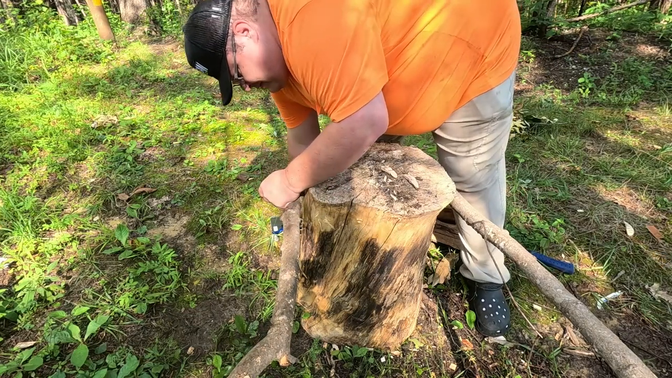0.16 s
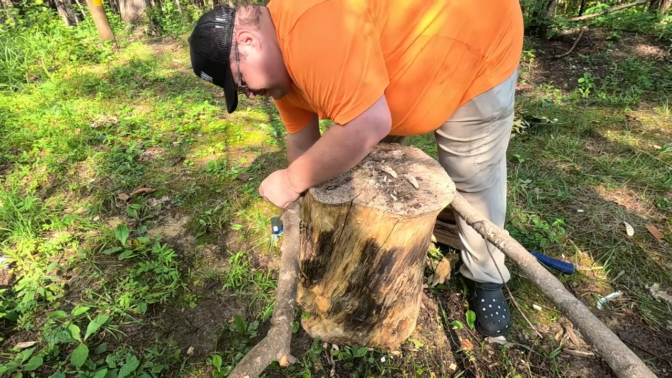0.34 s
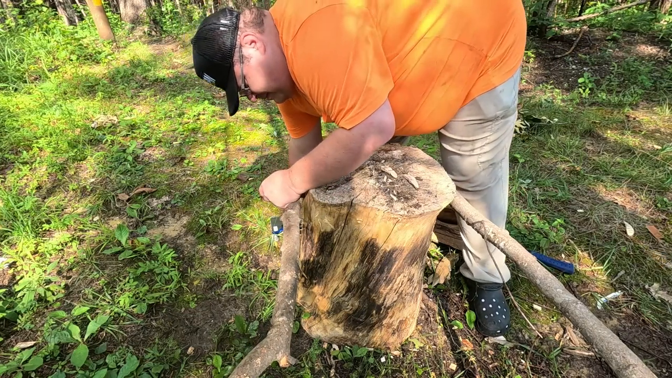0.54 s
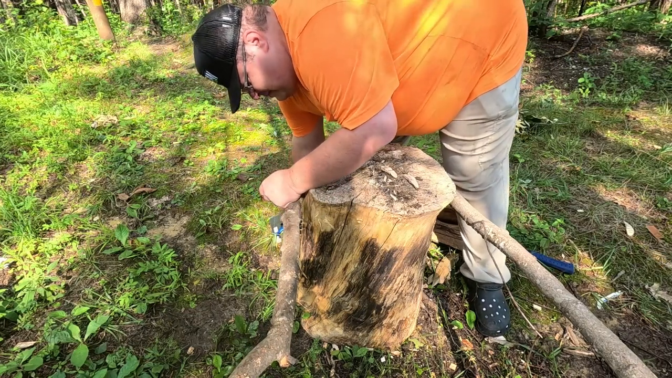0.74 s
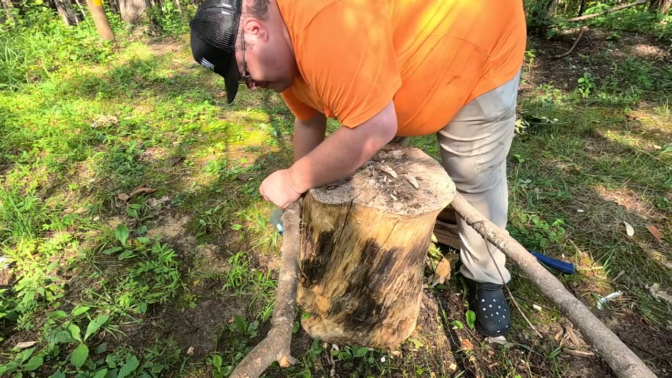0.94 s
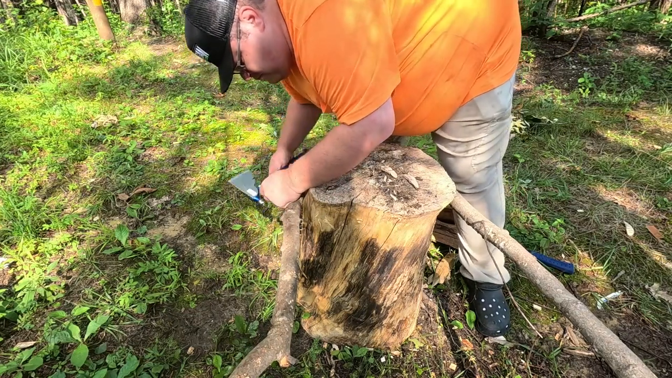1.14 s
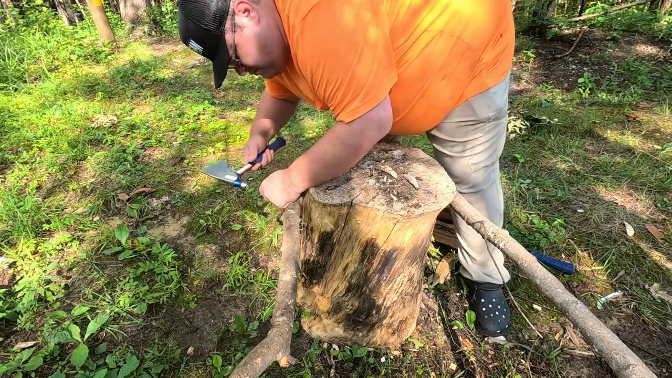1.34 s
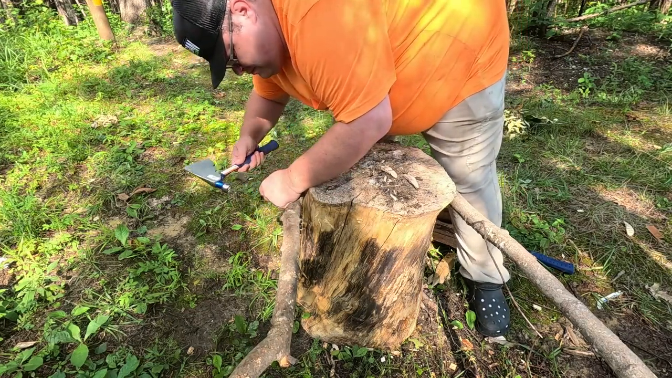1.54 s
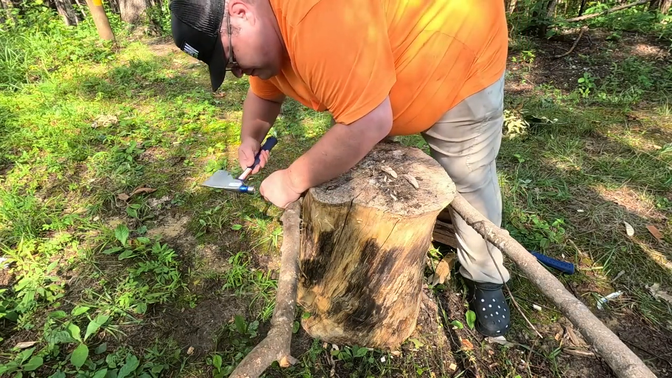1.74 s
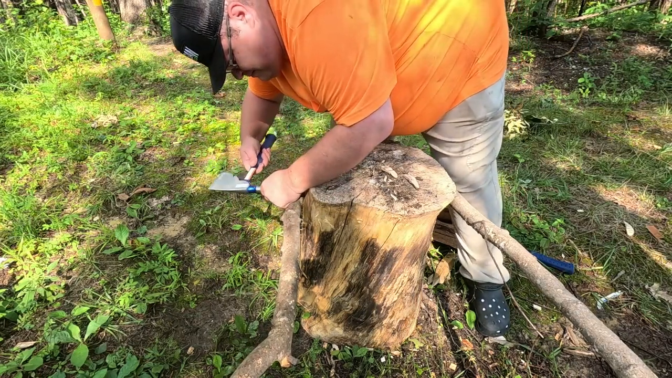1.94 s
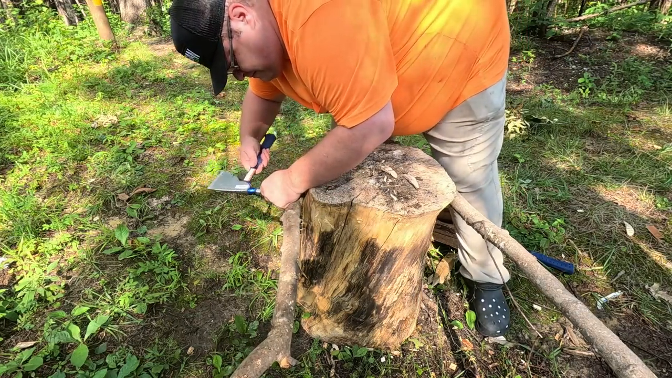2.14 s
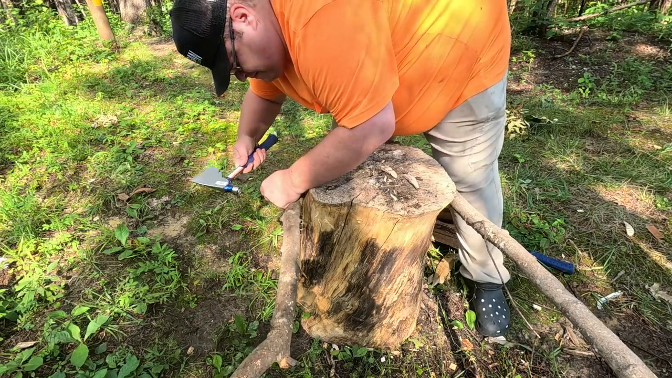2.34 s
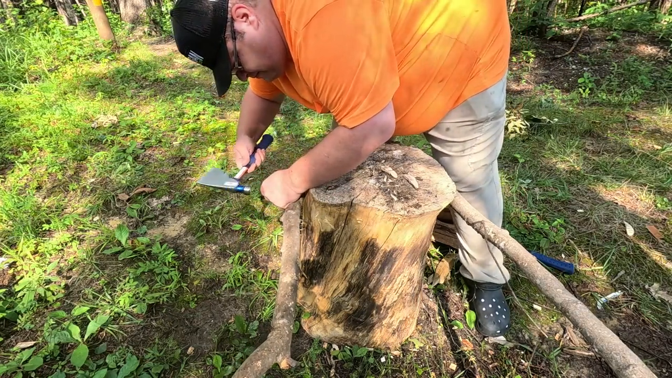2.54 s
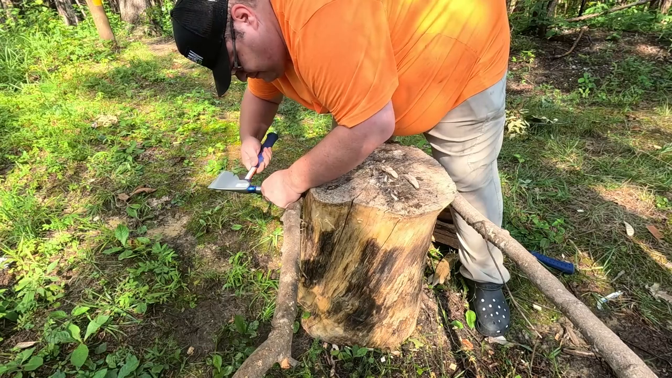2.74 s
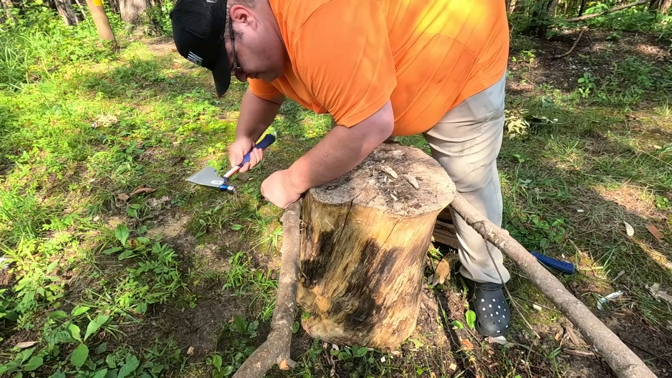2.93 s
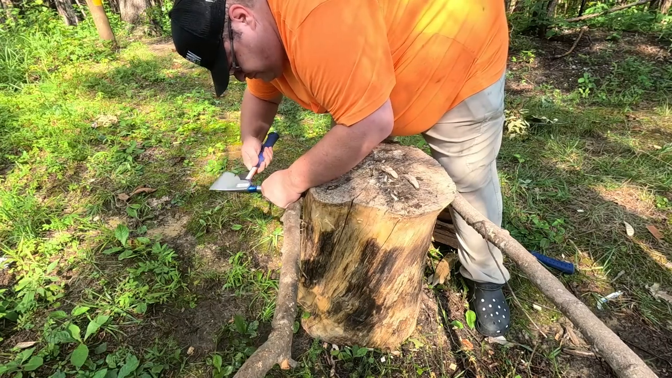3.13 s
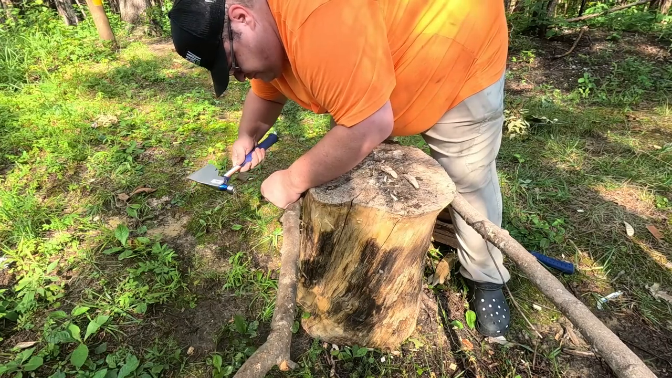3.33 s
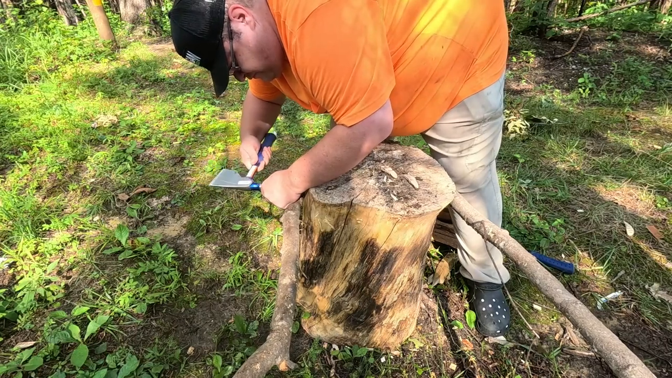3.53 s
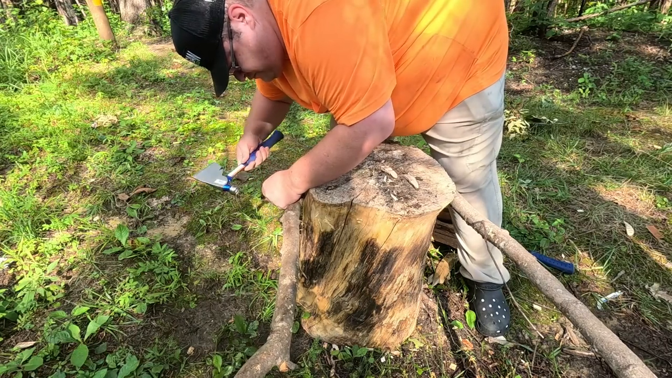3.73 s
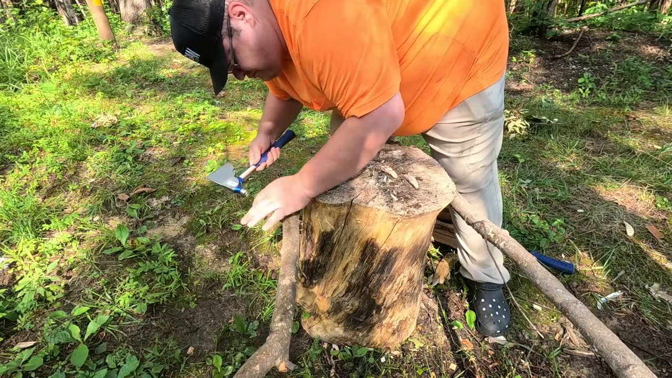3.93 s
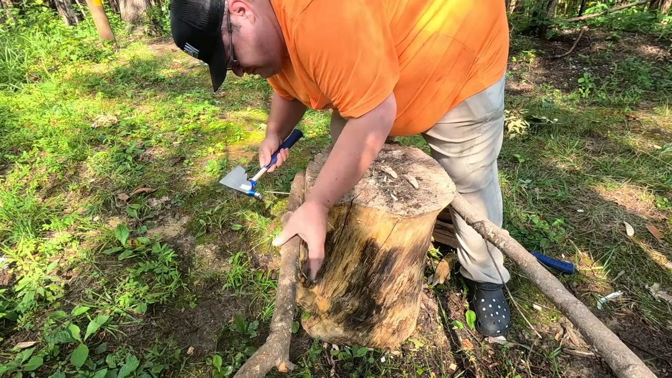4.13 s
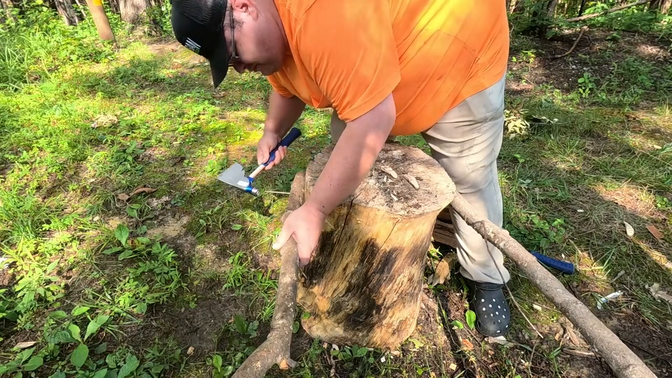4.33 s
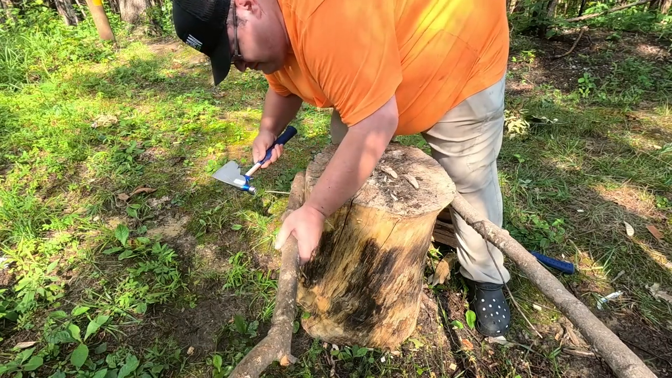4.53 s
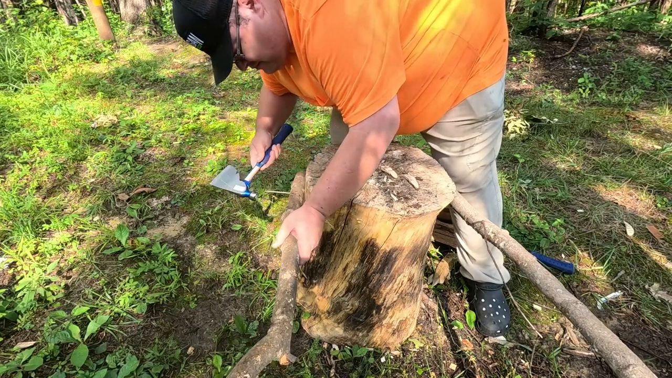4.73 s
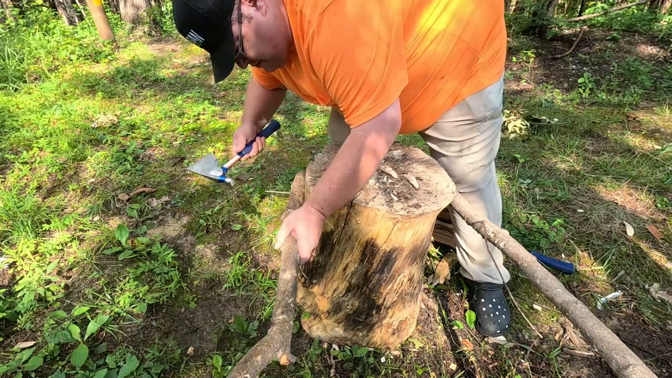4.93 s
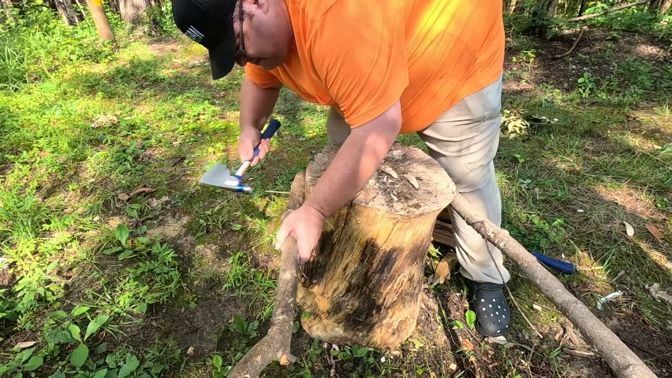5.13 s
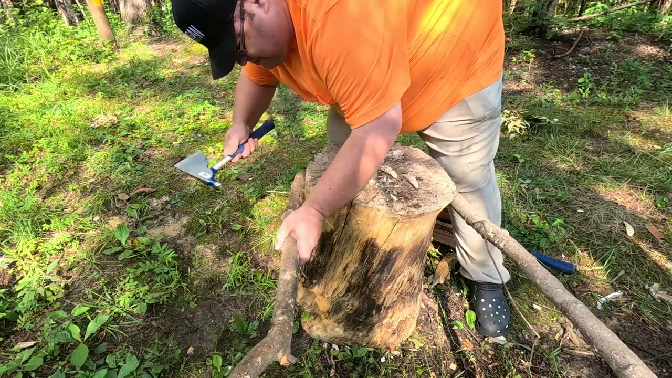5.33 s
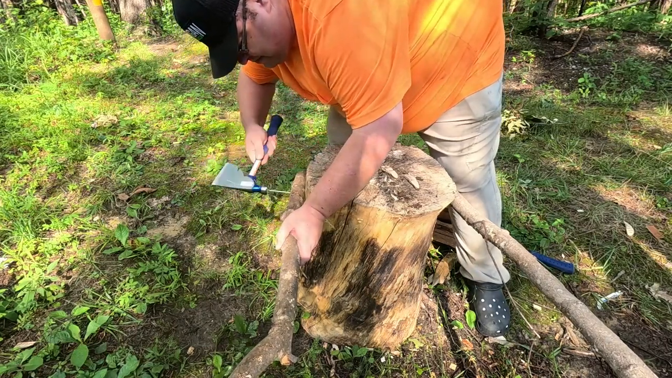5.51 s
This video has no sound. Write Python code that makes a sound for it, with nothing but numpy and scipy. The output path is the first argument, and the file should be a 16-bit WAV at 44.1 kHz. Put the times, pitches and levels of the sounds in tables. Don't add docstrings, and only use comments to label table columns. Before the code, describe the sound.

Close stereo microphone in a wood, soft leaf hiss all round and a faint far machine hum dying away. A twig scuffs dry leaves, then the back of a hatchet hits a nail in a branch seven times, each a short clacking crack with woody knock, thin steel ring and faint echo from the trees. After a pause with tiny ticks, a far bird whistles and a final blow lands.

```python
import sys
import numpy as np
from scipy import signal
from scipy.fft import rfft, irfft
from scipy.io import wavfile
from scipy.ndimage import uniform_filter1d, minimum_filter1d

SR = 44100
rng = np.random.default_rng(int(sys.argv[2]) if len(sys.argv) > 2 else 0)


def unload_wav(signal):
    wavfile.write(
        sys.argv[1],
        SR,
        np.round(np.clip(np.atleast_2d(signal).T, -1, 1) * 32767).astype(np.int16),
    )


def undo_db(level):
    steps = np.asarray(level, float) / 20
    return 10 ** steps


N = 245637

# [f/Hz, width/Hz, level/dB]
UPPER_HUMS = [(227.2, 3.1, -1), (269.7, 23, -5.5), (318.7, 13, -9.5), (433, 26, -14)]
# [t/s, level/dB]
MACHINE = [(0, -55), (.8, -52), (1.25, -56.5), (1.7, -63), (2.1, -62), (3.0, -72), (3.8, -76), (4.9, -64),
           (5.57, -77)]
DRONE_HZ = 162.7
UPPER_HUM_DB, UPPER_SHARE, UPPER_LAG_S = -58, 0.61, .35
# [t/s, level/dB]
GUSTS = [(2.02, -54), (2.36, -50.5), (2.67, -55), (2.93, -52), (3.4, -65.5), (4.4, -62), (4.85, -58.5),
         (5.4, -55.5)]
GUST_RISE_S, GUST_FALL_S, CALM_DB = .07, 0.12, -71.5

# [f/Hz, level/dB per Hz]
LEAVES = [(20, -8.5), (60, -7), (150, -0.5), (300, -8.5), (500, -15), (800, -18), (1050, -10.5),
          (1600, -11), (3200, -11), (6300, -17.5), (8000, -25.5), (10500, -33), (13000, -46.5),
          (16000, -68)]
# [t/s, level/dB]
LEAF_LEVEL = [(0, -52.5), (.25, -55.5), (.6, -53.5), (1.9, -53.5), (2.35, -55), (3.9, -57.5), (4.5, -55),
              (5.57, -55)]
# [f/Hz, likeness 0-1]
SAME = [(60, 1), (150, 0.97), (380, 0.45), (950, 0.68), (2380, 0.51), (5980, 0.8), (15000, 0.27)]
# [f/Hz, left minus right/dB]
LEAVES_LEAN = [(60, -1), (180, -2), (550, -1), (1650, 2.5), (4970, 2.0), (15000, 6)]

# [t/s, length/s, from f/Hz, to f/Hz, level/dB]
BIRD = [
    (4.94, .06, 2830, 3250, -61),
    (5.118, .06, 2950, 2550, -58),
    (5.19, .04, 2800, 2780, -65),
]
# [t/s, length/s, level/dB, from f/Hz, to f/Hz]
RUSTLE = (.45, .38, -61, 1100, 1800)

# [f/Hz, t60/s]
WOODLAND = [(300, 0.73), (1000, 0.26), (2500, 0.79), (6000, 0.49), (12000, 0.42)]
# [f/Hz, level/dB]
ECHO_COLOUR = [(200, -4), (700, 3.5), (1500, 4), (2050, -4.5), (2230, 9), (2450, -2), (3100, 4.5),
               (4000, 5), (6900, 7), (8000, -2.5), (10500, -0.5), (13500, -13)]
ECHO_DB, ECHO_LOOSE_DB = -25.5, -12.5

# [t/s, level/dB, brightness/dB]
TICKS = [
    (0.7938, -52, -16.5),
    (0.8676, -58, -2),
    (3.6474, -27, -10),
    (4.5054, -53, -6),
    (4.5166, -42, -13),
    (4.5413, -50, -18),
]
TICK_SHARES = [5, 0, -6, 5, -4, -8]
TICK_GLINTS = [-17, 4, 5, -5, -12, -7]
TICK_SIZZLE_DB = 16

# [t/s, force/dB, brightness/dB, nearness to the middle of the poll 0-1, tilt of the head 0-1]
BLOWS = [
    (1.8136, -20.5, -4.5, 0, 0.4),
    (2.038, -18.5, -0.5, .15, .05),
    (2.2918, -15, -5, .27, 0.64),
    (2.5478, -13.5, -7, 1, 0),
    (2.865, -13.5, -6, .28, 0.2),
    (3.2184, -13, -6.5, .12, 0.2),
    (3.5878, -13, -10, .15, 0.86),
    (5.2938, -10.5, -11.5, .72, 0.93),
]
SET_BLOWS, TIGHT_BLOWS, REST_S = .9, 3.5, 1.0
HAND_OFF_S = 4.0

# [f/Hz, width/Hz]
CRACK = [(1565, 260), (2190, 300), (2630, 380), (3090, 450), (3750, 560), (4250, 710)]
# [level/dB, loose nail/dB, hand off the nail/dB]
SHARE_LAW = [(2, -3, -4.5), (-5.5, -17, 12.5), (2, -3, -4.5), (7, -2.5, -2.5), (1, 3, 2), (-5.5, 9.5, -5)]
# [f/Hz, width/Hz]
SNAP = [(5300, 440), (6200, 550), (7100, 220), (7700, 360), (8700, 830), (9750, 650)]
# [level/dB, loose nail/dB, struck mid-poll/dB, hand off the nail/dB]
GLINT_LAW = [(-1, 20, -7, 9), (3, 10.5, -20, 4), (-0.5, 12, 6.5, -1), (0, 9, 14.5, -16), (-0.5, -12, 9, 2),
             (-4.5, 19, -10.5, 2)]
BROAD_DB, SIZZLE_DB, SIZZLE_TIGHT_DB = -6.5 + .5, -24.5, -6
SLIP_S, SLIP_LOOSE_S = 0.0051, .008
# [from f/Hz, to f/Hz, level/dB, t60/s]
SCATTER = [(660, 2970, -8.5, 0.025), (1670, 2300, -7.5, 0.048), (3300, 6600, -38, 0.13)]

# [f/Hz, level/dB, t60/s]
BRANCH = [(436, -25, .15), (478, -23, 0.17), (603, -16, 0.17), (622, 0, 0.055), (668, -4, 0.045),
          (727, -26, .16), (795, -15, 0.11), (905, -19, .06), (1042, -3, 0.072), (1110, -10, .06),
          (1185, -2, 0.055), (1290, -9, 0.05)]
UPPER_DB, UPPER_TIGHT_DB, UPPER_FREED_DB = 4, -7, -4
# [f/Hz, level/dB, t60/s]
STUMP = [(67.9, -26, 0.62), (118, -23.5, 0.27), (171, -21.5, 0.28), (222.4, 0, 0.22), (286.6, 8.5, 0.19)]
BOOM_LOOSE_DB = -12
KNOCK_DB, BOOM_DB = -9, -22.5
PAUSE_DB = (-5, -4, 2.5)

# [f/Hz, t60/s, loss to the grip/dB]
STEEL = [(4659, .8, 5), (6545, .08, 0), (9530, .4, 3), (11035, .36, 15), (12965, .36, 14), (14470, .35, 0)]
# [ring/dB, after a pause/dB, tight grip/dB, struck mid-poll/dB, tilted/dB]
STEEL_LAW = [(-49, 11, 0, 0, 0), (-34, 0, -16, -4, 0), (-70, 0, 0, 0, 21), (-55, 2, 0, -24, 0),
             (-61, 3, 0, -26, 0), (-110, 0, 0, 0, 42)]
REBOUND_S, SWELL_TIGHT = 0.097, 1.4

# [f/Hz, left minus right/dB]
BLOW_LEAN = [(60, 5), (300, -1), (700, -1.5), (1400, -2.5), (2800, -1), (5600, 0.5), (10000, 3.5),
             (14000, 4.5)]
# [f/Hz, lead of the left port/rad]
BLOW_LEAD = [(0, 0.62), (2410, -0.34), (10200, -0.55), (10800, 0.4), (11200, -0.098), (13000, 1.6),
             (14100, 0.1), (16100, -0.33)]
# [f/Hz, level/dB]
HAZE = [(100, -39), (350, -36), (600, -8), (1200, -25.5), (2500, -24), (5000, -48), (8000, -17),
        (10000, -46), (14000, -40)]


def evened(x):
    return x / np.sqrt(np.mean(x ** 2) + 1e-20)


def peaked(x):
    return x / np.sqrt(uniform_filter1d(x ** 2, 130).max())


def read(points, hz):
    f, value = np.transpose(points)
    return np.interp(np.log(hz + 1), np.log(f + 1), value)


def curve(rows):
    return np.interp(np.arange(N) / SR, [r[0] for r in rows], [r[1] for r in rows])


def add(mix, s, sound):
    part = mix[round(s * SR):][:len(sound)]
    part += sound[:len(part)]


def resonate(x, hz, width):
    r = np.exp(-np.pi * width / SR)
    return 2 * signal.lfilter([1 - r], [1, -r * np.exp(2j * np.pi * hz / SR)], x).real


def resonate_twice(x, hz, width):
    return resonate(resonate(x, hz, width), hz, width)


def band(x, lo_hz, hi_hz):
    return signal.sosfilt(signal.butter(2, [lo_hz, hi_hz], "band", fs=SR, output="sos"), x)


def ring(modes, length, rise):
    t = np.arange(round(length * SR)) / SR
    sines = sum(undo_db(db - 60 * t / t60) * np.sin(2 * np.pi * hz * t) for hz, db, t60 in modes)
    return (1 - np.exp(-t / rise)) * sines


def drone():
    t = np.arange(N) / SR
    n, m, low, side, lumps = rng.standard_normal((N, 5)).T
    hum = np.sqrt(2) * np.sin(2 * np.pi * DRONE_HZ * t) + 0.35 * evened(resonate_twice(n, DRONE_HZ, 12))
    upper = sum(undo_db(db) * evened(resonate_twice(m, hz, w)) for hz, w, db in UPPER_HUMS)
    hum_db = curve(MACHINE)
    upper_db = UPPER_HUM_DB + UPPER_SHARE * (np.interp(t - UPPER_LAG_S, t, hum_db) - hum_db.max())
    lumpy = undo_db(3.3 * evened(uniform_filter1d(lumps, 3000)))
    rumble = evened(band(low + np.outer([.35, -.35], side), 31, 135) * lumpy)
    puffs = undo_db(CALM_DB)
    for s, db in GUSTS:
        puffs = puffs + undo_db(db) * np.exp(-abs(t - s) / np.where(t < s, GUST_RISE_S, GUST_FALL_S))
    return undo_db(hum_db) * evened(hum) + undo_db(upper_db) * evened(upper) + puffs * rumble


def leaves(patchy_db=0.65, gust_db=0.04):
    frames, hz = N // 256 + 5, np.fft.rfftfreq(1024, 1 / SR)
    a, b, c, d, patches = rng.standard_normal((frames, 513, 5)).T
    patches = evened(uniform_filter1d(uniform_filter1d(patches, 12, 0), 14, 1))
    gust = evened(uniform_filter1d(rng.standard_normal(frames), 6))
    same = np.clip(read(SAME, hz), -1, 1)[:, None]
    left = a + 1j * b
    z = np.array([left, same * left + np.sqrt(1 - same ** 2) * (c + 1j * d)])
    lean_db = np.multiply.outer([.5, -.5], read(LEAVES_LEAN, hz))
    z *= undo_db((read(LEAVES, hz) + lean_db)[..., None] + patchy_db * patches + gust_db * gust)
    return undo_db(curve(LEAF_LEVEL) + 0.97) * evened(signal.istft(z, nperseg=1024, noverlap=768)[1][:, :N])


def bird():
    out = np.zeros(N)
    for s, length, from_hz, to_hz, db in BIRD:
        u = np.arange(0, 1, 1 / (length * SR))
        tone = np.sin(2 * np.pi * np.cumsum(from_hz + (to_hz - from_hz) * u) / SR)
        add(out, s, np.sqrt(2) * undo_db(db) * tone * np.sin(np.pi * u ** 0.55) ** 2)
    return out


def rustle():
    s, length, db, lo_hz, hi_hz = RUSTLE
    draw, out = rng.standard_normal((SR // 2, 2)), np.zeros(N)
    u = np.minimum(np.arange(len(draw)) / (length * SR), 1)
    grain = resonate(draw[:, 0], lo_hz * 1.1, 120) + 0.41 * band(draw[:, 0], lo_hz, hi_hz)
    ragged_db = 3.4 * evened(uniform_filter1d(draw[:, 1], 900))
    add(out, s, undo_db(db + ragged_db) * evened(grain) * np.sin(np.pi * u ** 0.37))
    return out


def trees(x, swell=0.037, patchy_db=0.5):
    hz, t, z = signal.stft(rng.standard_normal((2, SR // 2)), SR, nperseg=256)
    clumps = rng.standard_normal(z.shape[1:])
    clumps = evened(uniform_filter1d(uniform_filter1d(clumps, 8, 0), 5, 1))
    z = z * (1 - np.exp(-(t / swell) ** 2)) * undo_db(patchy_db * clumps)
    z = z * undo_db(read(ECHO_COLOUR, hz)[:, None] - 60 * t / read(WOODLAND, hz)[:, None])
    tail = signal.istft(z, SR, nperseg=256)[1]
    tail = tail + 0.33 * tail[::-1]
    return signal.fftconvolve(x[None], tail / np.linalg.norm(tail[0]), axes=1)[:, :N]


def chatter(length, spread_db=5.0, sag=0.0046, fade=0.0057, touch=7.4):
    draw = rng.standard_normal((1800, 2))
    t = np.arange(len(draw)) / SR
    shape = np.clip(t / 0.00016, 0, 1) * np.exp(-t / sag - np.maximum(t - length, 0) / fade)
    first = touch * signal.unit_impulse(len(t), idx=22)
    return first + draw[:, 0] * undo_db(spread_db * evened(uniform_filter1d(draw[:, 1], 12))) * shape


def short_rings(force, rings, levels_db):
    return sum(undo_db(db) * resonate_twice(force, hz, w) / np.sqrt(w) for (hz, w), db in zip(rings, levels_db))


def knock(force, shares_db, glints_db, bright_db, broad_db, sizzle_db, edge_hz=10100):
    edge_on = force * np.exp(-np.arange(len(force)) / SR / 0.0075)
    dull = peaked(short_rings(force, CRACK, shares_db))
    bright = undo_db(bright_db) * peaked(short_rings(edge_on, SNAP, glints_db))
    broad = undo_db(broad_db) * peaked(band(band(force, 610, 5440), 610, 5440))
    sizzle = undo_db(sizzle_db) * peaked(band(band(edge_on, 8400, 13000), 8900, 13600))
    edge = signal.cheby1(8, 1, edge_hz, fs=SR, output="sos")
    return signal.sosfilt(edge, dull + bright + broad) + sizzle


def ticks():
    out = np.zeros(N)
    for s, db, bright_db in TICKS:
        force = chatter(0.0035, fade=0.0044, touch=3.8)
        sound = knock(force, TICK_SHARES, TICK_GLINTS, bright_db, -6, bright_db - TICK_SIZZLE_DB)
        add(out, s - .001, undo_db(db - 3.5) * sound)
    return out


def scatter():
    draw = rng.standard_normal((4000, 2))
    t = np.arange(len(draw)) / SR
    ragged = draw[:, 0] * undo_db(4.3 * evened(uniform_filter1d(draw[:, 1], 60))) * (1 - np.exp(-t / 0.001))
    tail = np.zeros(len(t))
    for lo_hz, hi_hz, db, t60 in SCATTER:
        tail += undo_db(db - 60 * t / t60) * evened(band(band(ragged, lo_hz, hi_hz), lo_hz, hi_hz))
    return tail


def steel(rings_db, swell, rise=0.0022, grip=0.032, lag=.045):
    t = np.arange(round(.6 * SR)) / SR
    held = np.clip((t - REBOUND_S) / grip, 0, 1)
    modes = [undo_db(db - 60 * t / t60 - loss_db * held) * np.sin(2 * np.pi * hz * t)
             for (hz, t60, loss_db), db in zip(STEEL, rings_db)]
    late = 1 - np.clip(swell, 0, 1) * np.exp(-t / lag)
    return (1 - np.exp(-t / rise)) * (late * modes[0] + sum(modes[1:]))


def branch(force, tight, freed):
    push = np.exp(-np.arange(300) / SR / 0.0012) * (1 + 0.46 * force[:300])
    upper_db = UPPER_DB + UPPER_TIGHT_DB * tight + UPPER_FREED_DB * freed
    modes = ring(BRANCH[:5], .3, 0.0034) + undo_db(upper_db) * ring(BRANCH[5:], .3, 0.0054)
    return peaked(band(signal.oaconvolve(modes, push / push.sum()), 610, 2100))


def stump():
    return peaked(band(ring(STUMP, 0.69, 0.0027), 42, 160))


def history():
    s = np.array([row[0] for row in BLOWS])
    number, pause = np.arange(len(s)), np.diff(s, prepend=0) > REST_S
    run = number - np.maximum.accumulate(number * pause)
    return zip(np.exp(-number / SET_BLOWS), pause, 1 - np.exp(-run / TIGHT_BLOWS))


def hatchet():
    near, far, click = np.zeros(N), np.zeros(N), signal.unit_impulse(400)
    for (s, force_db, bright_db, middle, tilt), (loose, pause, tight) in zip(BLOWS, history()):
        freed = s > HAND_OFF_S
        shares = np.dot(SHARE_LAW, [1, loose, freed])
        glints = np.dot(GLINT_LAW, [1, loose, middle, freed])
        rings_db = np.dot(STEEL_LAW, [1, pause, tight, middle, tilt])
        knock_db, boom_db, broad_db = np.add((KNOCK_DB, BOOM_DB, BROAD_DB), pause * np.array(PAUSE_DB))
        boom_db = boom_db + BOOM_LOOSE_DB * loose * (1 - pause)
        sizzle_db = SIZZLE_DB + SIZZLE_TIGHT_DB * tight
        echo_db = ECHO_DB + ECHO_LOOSE_DB * loose ** 2

        force = chatter(SLIP_S + SLIP_LOOSE_S * loose ** 2)
        crack = knock(force, shares, glints, bright_db, broad_db, sizzle_db)
        add(near, s - .0004, undo_db(force_db) * crack)
        add(near, s + 0.00044, undo_db(force_db + knock_db + 4) * branch(force, tight, freed))
        add(near, s + 0.0011, undo_db(force_db + boom_db + 9) * stump())
        add(near, s, undo_db(force_db) * scatter())
        add(near, s, steel(rings_db, SWELL_TIGHT * np.sqrt(tight)))
        sent = band(click, 670, 4100) + undo_db(bright_db) * band(click, 4670, 8400)
        add(far, s, undo_db(force_db + echo_db + 31.5) * sent)
    return near, far


def placed(x):
    hz = np.fft.rfftfreq(N, 1 / SR)
    lean = undo_db(np.multiply.outer([.5, -.5], read(BLOW_LEAN, hz)))
    lead = np.exp(np.multiply.outer([.5j, -.5j], read(BLOW_LEAD, hz)))
    return irfft(rfft(x) * lean * lead, N)


def scene():
    near, far = hatchet()
    return placed(near + ticks()) + trees(far) + leaves() + drone() + bird() + rustle()


def lead_haze(x):
    hz, t, z = signal.stft(x, SR, nperseg=1536, noverlap=1024)
    a, b = rng.standard_normal((len(t), len(hz), 2)).T
    haze = abs(z) * (a + 1j * b) * undo_db(read(HAZE, hz)[:, None])
    return signal.istft(haze, SR, nperseg=1536, noverlap=1024)[1][:, :N]


def top_cut(x):
    return signal.sosfilt(signal.butter(12, 16550, fs=SR, output="sos"), x)


def record(dry):
    power_db = 10 * np.log10(abs(uniform_filter1d((dry ** 2).mean(0), 200, origin=99)) + 1e-12)
    fall = np.arange(N) * 216.0 / SR
    over_db = np.maximum(np.maximum.accumulate(power_db + fall) - fall + 34, 0)
    ducked = dry / undo_db(0.12 * signal.oaconvolve(over_db, np.hanning(300) / 440.0)[:N])
    loudest = -minimum_filter1d(-abs(ducked).max(0), 200)
    peak = signal.oaconvolve(loudest, np.hanning(100) / 49.5, "same")
    guarded = ducked / np.maximum(peak / .93, 1)
    ahead = np.clip(2 - uniform_filter1d(over_db, 60) / 8, 0, 1)
    return top_cut(guarded + ahead * lead_haze(guarded))


dry = scene()
out = record(dry)
unload_wav(out)
```